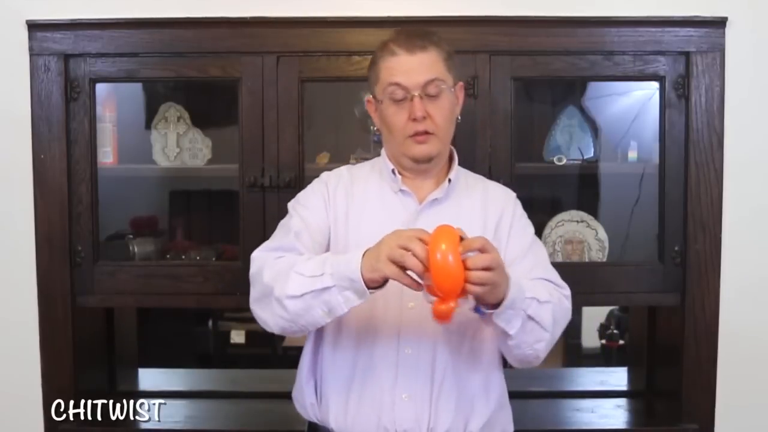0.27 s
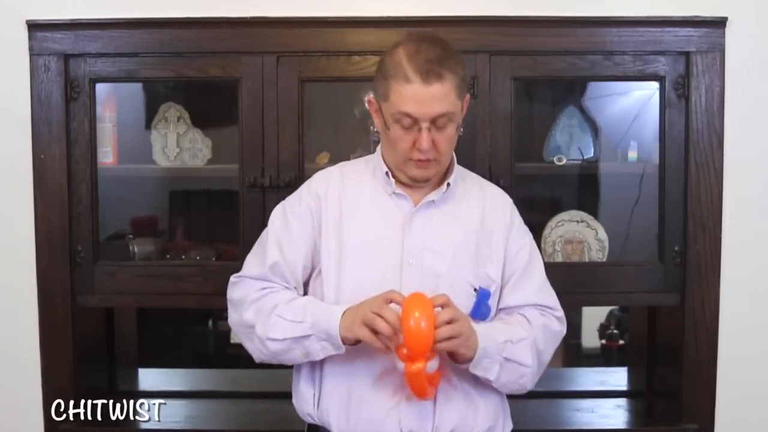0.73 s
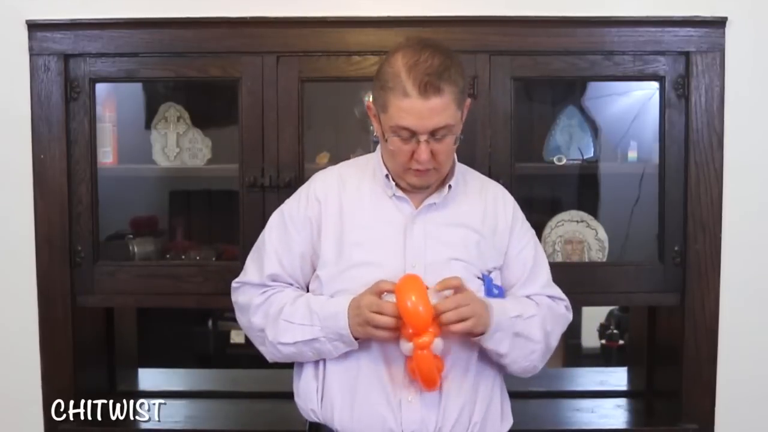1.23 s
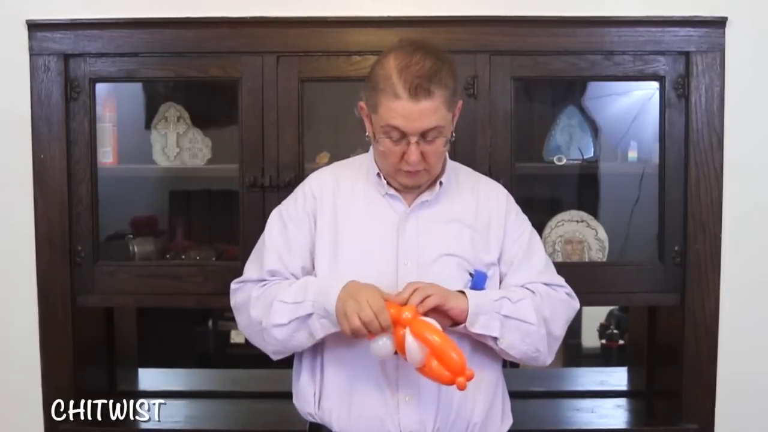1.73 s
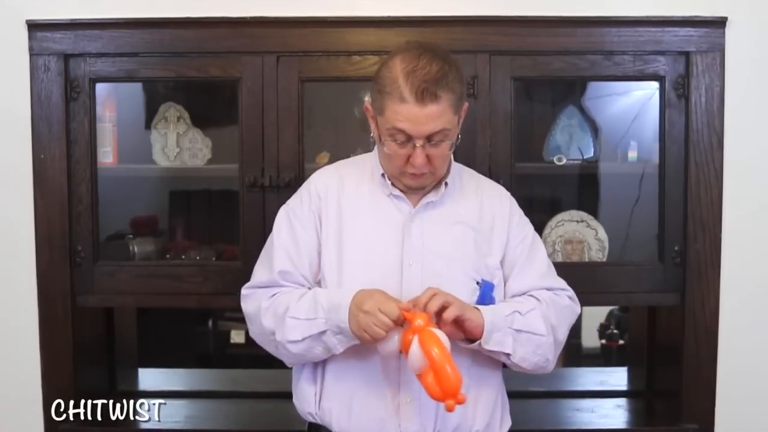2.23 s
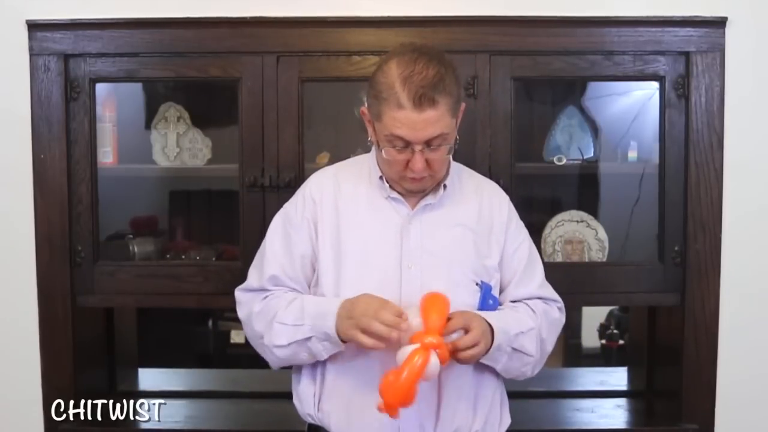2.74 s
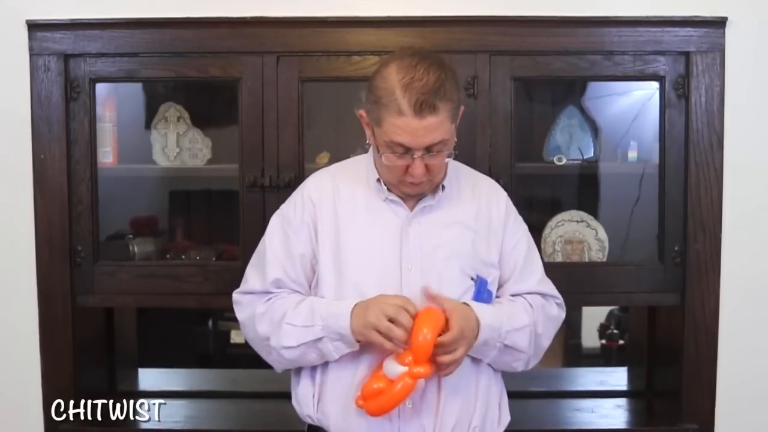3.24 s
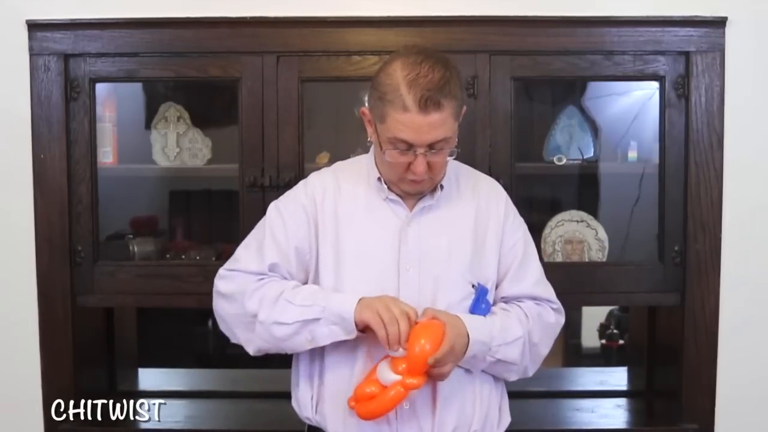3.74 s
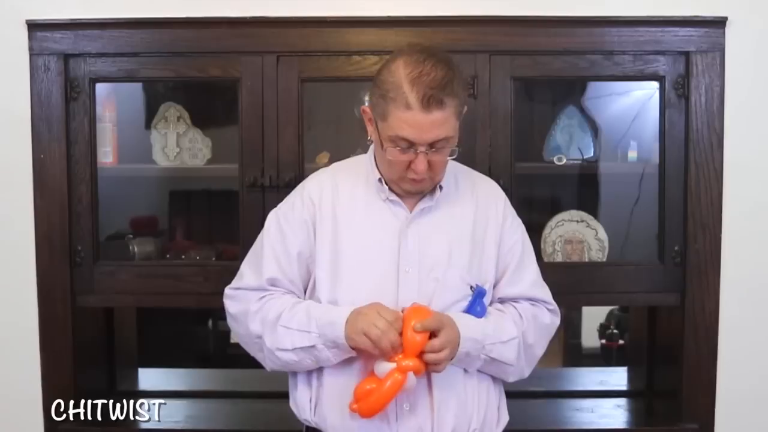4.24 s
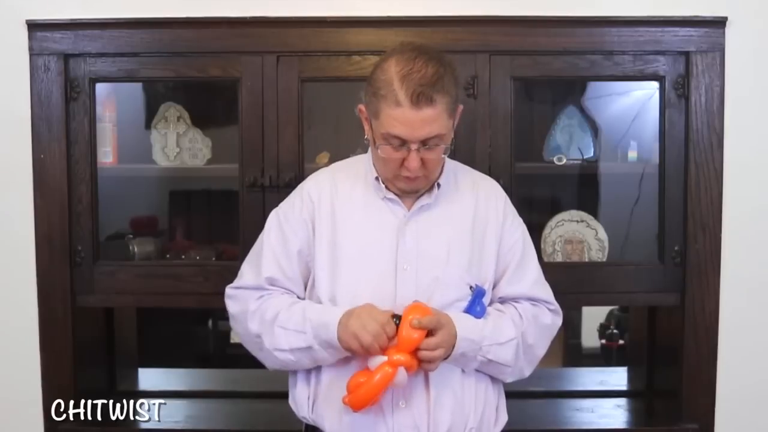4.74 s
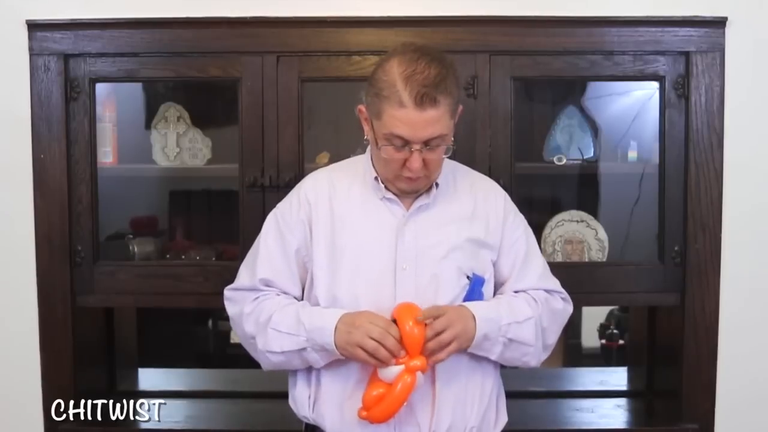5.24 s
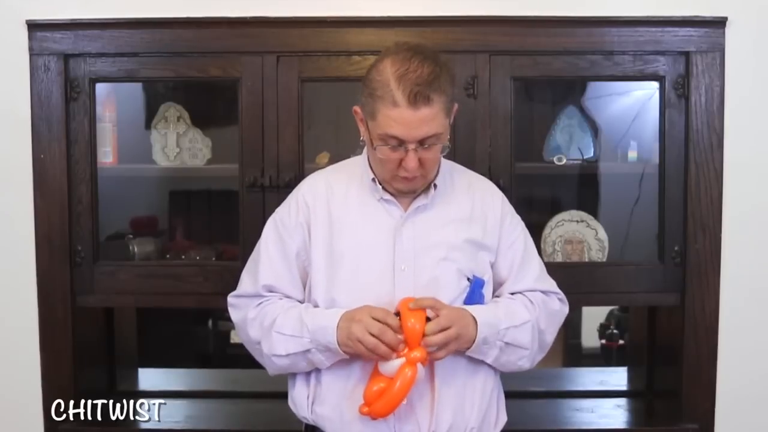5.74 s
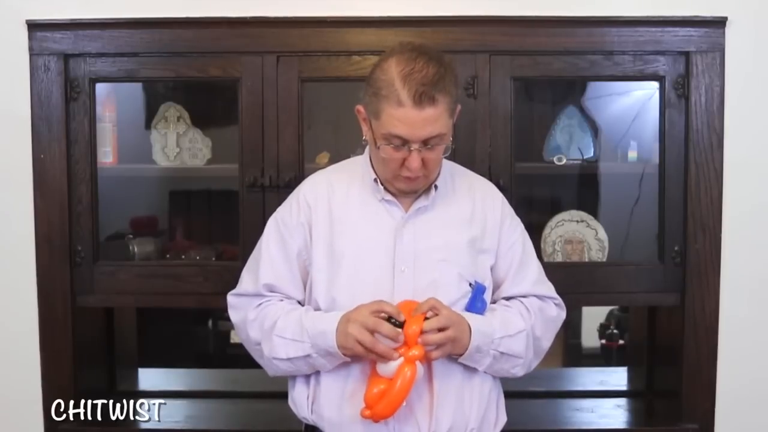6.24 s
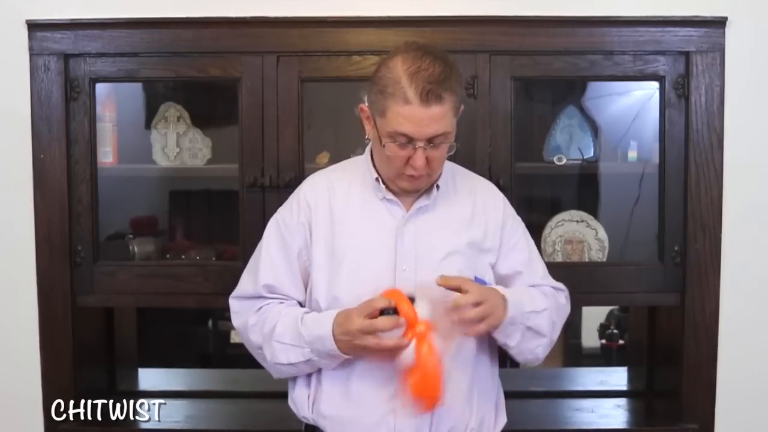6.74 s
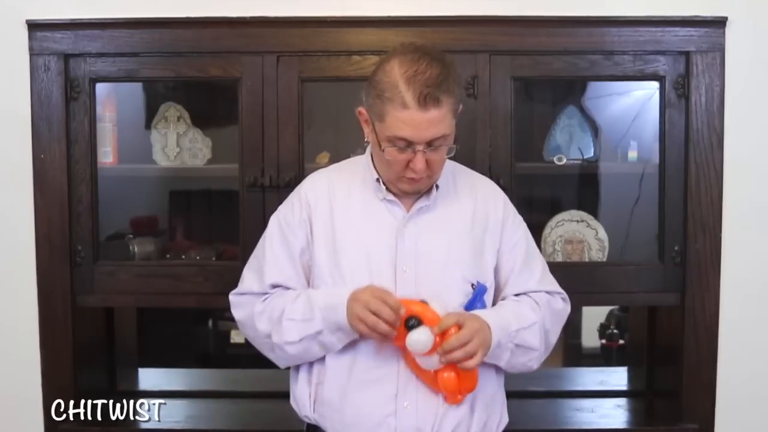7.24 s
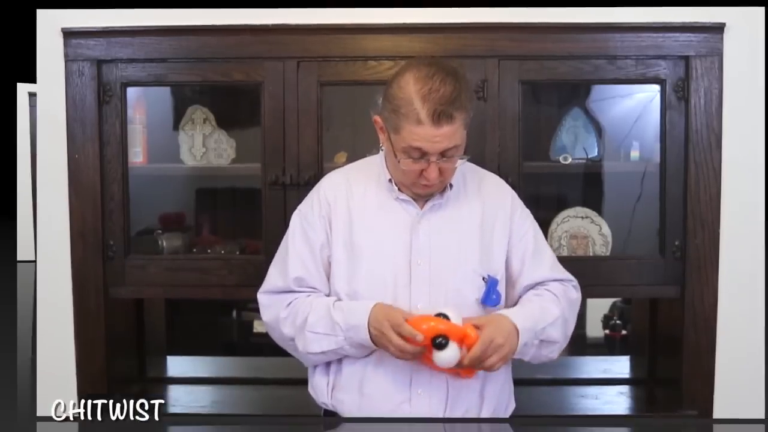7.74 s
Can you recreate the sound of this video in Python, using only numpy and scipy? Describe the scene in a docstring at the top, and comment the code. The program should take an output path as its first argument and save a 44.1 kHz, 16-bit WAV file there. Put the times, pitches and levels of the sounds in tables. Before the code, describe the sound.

A balloon creaks, rubs and squeaks in uneven bursts as it is twisted by hand, with little snaps and slight room echo.

```python
"""A bare living room, where hands squeeze and twist a latex balloon figure a couple of metres away.
Rubber sticks and slips on rubber. Irregular slips creak and groan in the air bubbles, or scrape and
hiss on the skin; periodic slips make pitched squeaks; a stuck patch that lets go makes a snap.
The hard walls reflect it all, and a faint room tone lies below."""
import sys
import numpy as np
from scipy import signal
from scipy.fft import rfft, irfft, next_fast_len
from scipy.io import wavfile
from scipy.ndimage import map_coordinates

SR = 44100
rng = np.random.default_rng(int(sys.argv[2]) if len(sys.argv) > 2 else 0)


def waveform_to_disk(signal):
    """Save audio, clipped to [-1, 1], as 16-bit WAV at the path in sys.argv[1]."""
    frames = np.transpose(np.atleast_2d(signal))
    scaled = np.clip(frames, -1, 1) * 32767
    samples = np.round(scaled).astype(np.int16)
    wavfile.write(sys.argv[1], SR, samples)


N = 352800
BAND_LIMIT_HZ = 15800

# Friction spectra of scraping rubber and of hissing skin: f/Hz, relative level/dB
SCRAPE_SPECTRUM = [(200, -42), (700, 2.5), (1100, -0.5), (2000, -1), (3500, 3.5), (5000, -10.5),
                   (16000, -77)]
HISS_SPECTRUM = [(250, -42), (1000, -7), (3000, -3), (4500, -3), (7000, -8), (10000, -12.5), (13000, -19.5),
                 (16000, -30)]


def amp(db):
    """Amplitude ratio of a level in decibels."""
    return 10 ** (np.asarray(db) / 20)


def unit(x):
    """Normalisation to an rms value of 1."""
    return x / np.sqrt(np.mean(x ** 2) + 1e-20)


def along(points, hz):
    """Interpolation of (f/Hz, value) points on a logarithmic frequency axis."""
    f, values = np.transpose(points)
    return np.interp(np.log(hz + 1), np.log(f + 1), values)


def wobble(count, rate):
    """Smooth random modulation: count samples of a spline with rate knots a second."""
    knots = rng.standard_normal(int(count * rate / SR) + 4)
    return map_coordinates(knots, [np.arange(count) * rate / SR])


def filtered(x, response):
    """Linear filtering: the spectrum of x times a complex frequency response."""
    size = next_fast_len(x.shape[-1] + 8192)
    return irfft(rfft(x, size) * response(np.fft.rfftfreq(size, 1 / SR)), size)[..., :x.shape[-1]]


def diffuse_pair(spectra, hz):
    """Spatial coherence: at two points of a diffuse field, long waves are alike and short ones are not."""
    # Left-right likeness: f/Hz, coherence
    coherence = [(30, 0.5), (100, 0.99), (300, 0.92), (600, 0.77), (1200, 0.27), (2500, 0.018),
                 (12000, 0.018)]
    angle = np.arccos(np.clip(along(coherence, hz), -1, 1)) / 2
    mid, side = spectra[0] * np.cos(angle), spectra[1] * np.sin(angle)
    return np.array([mid + side, mid - side])


def room_tone():
    """Ambient noise: air and street form a faint, steady diffuse field."""
    # Background spectrum: f/Hz, relative spectral density level/dB
    spectrum = [(20, -38), (40, -12), (100, -11), (200, -6.5), (300, -3.5), (800, -2), (2700, -8.5),
                (6000, -20), (15500, -42)]
    hz = np.fft.rfftfreq(N, 1 / SR)
    noise = diffuse_pair(rfft(rng.standard_normal((2, N))), hz)
    return amp(-47) * unit(irfft(noise * amp(along(spectrum, hz)), N))


def reflections(x, decay, tail_samples, patterns):
    """Reverberation: convolution with decaying diffuse tails, whose pattern changes as the hands move."""
    hop = N // patterns
    out = np.zeros((2, N + 3 * hop + tail_samples + 256))
    crossfade = np.hanning(2 * hop)
    x = np.pad(x, (hop, 2 * hop))
    hz, t, noise = signal.stft(rng.standard_normal((patterns + 1, 2, tail_samples)), SR, nperseg=256)
    fade = amp(-60 * t / along(decay, hz)[:, None])
    spectra = diffuse_pair(noise.swapaxes(0, 1), hz[:, None]) * fade
    tails = signal.istft(spectra, SR, nperseg=256)[1].swapaxes(0, 1)
    tails = unit(tails) / np.sqrt(tails.shape[-1])  # unit energy on average
    for i, tail in enumerate(tails):
        segment = x[i * hop:(i + 2) * hop] * crossfade
        wet = signal.fftconvolve(segment[None], tail, axes=1)
        out[:, i * hop:][:, :wet.shape[1]] += wet
    return out[:, hop:][:, :N]


def slips(per_s, spread_db, flutter_db):
    """Irregular stick-slip: a Poisson train of uneven pulses that flutters as the grip changes."""
    occurs = rng.random(N) < per_s / SR
    size = np.clip(rng.standard_normal(N), -2, 2)
    pulses = occurs * np.sign(size) * amp(spread_db * np.abs(size))
    return pulses * amp(flutter_db * wobble(N, 45))


def bubble_resonance(pulses, spectrum):
    """Modal superposition: pulses, shaped by a spectrum, drive the bubbles and the broadband skin."""
    # Modes of the balloon figure: f/Hz, bandwidth/Hz, level/dB
    modes = [(274, 23, -5), (335, 78, -2.5), (452.6, 17, -2.5), (536.5, 20, 3.5), (617, 39, -3),
             (748.5, 17, -0.5), (835, 42, -2), (1055, 250, 0), (1192, 117, 0.5), (2460, 890, 0.5)]

    def response(f):
        ringing = sum(amp(db) * 1j * f * width / (hz * hz - f * f + 1j * f * width)
                      for hz, width, db in modes)
        return amp(along(spectrum, f)) * (0.81 + ringing)
    return filtered(pulses, response)


def moving_resonance(x, times, centre_hz, lift_db, width_octaves):
    """Formant: one broad resonance moves as the balloon changes shape; the result has rms 1."""
    hz, t, spectra = signal.stft(x, SR, nperseg=1024, noverlap=768)
    detuning = np.log2((hz[:, None] + 1) / np.interp(t, times, centre_hz)) / width_octaves
    spectra = spectra * amp(lift_db * np.exp(-detuning ** 2 / 2))
    return unit(signal.istft(spectra, SR, nperseg=1024, noverlap=768)[1][:N])


def strokes(rows):
    """Incoherent addition: strokes sum in power, giving two gains and a power-weighted resonance."""
    start, swell, hold, ease, db, second_db, hz = np.transpose(rows)[:, :, None]
    times = np.arange(0, N, 64) / SR
    # Swell and ease are times per 20 dB; any value below 3 ms, negative ones too, acts as 3 ms.
    early = np.maximum(start - times, 0) / np.maximum(swell, .003)
    late = np.maximum(times - start - np.abs(hold), 0) / np.maximum(ease, .003)
    power = amp(db - 20 * (early + late)) ** 2 + 1e-14
    first_gain, second_gain = (np.interp(np.arange(N) / SR, times, np.sqrt(layer.sum(0)))
                               for layer in (power, power * amp(second_db) ** 2))
    centre_hz = np.exp((power * np.log(hz)).sum(0) / power.sum(0))
    return first_gain, second_gain, times, centre_hz


def slides():
    """Sliding friction: quick, light slips of fingers and rubber scrape and hiss on the stretched skin."""
    # Light strokes: t/s, swell/s, hold/s, ease/s, scrape level/dB, hiss re scrape/dB, skin resonance f/Hz
    light_strokes = [(0, .01, 0.0034, 0.12, -20, -3.5, 1510), (.08, 6, 0.17, 0.4, -33.5, 4, 1860),
                     (.25, -0.06, 0.098, -0.03, -21.5, -14, 1530),
                     (.33, -0.2, 0.13, -0.03, -24.5, -30, 1560), (.47, 0.1, 0.11, -0.05, -25.5, -4, 1390),
                     (.66, -6, 0.19, 0.57, -41.5, -2.5, 1990), (.8, 0.05, 0.14, 0.17, -23, -4.5, 1530),
                     (1.1, -2, 0.13, -0.5, -52, -6, 1330), (1.229, -0.07, 0.0045, -0.01, -15, -19, 1270),
                     (1.401, 0.12, 0.045, -0.0261, -22.5, -16, 1370),
                     (1.543, 3.5, 0.01, -0.43, -39.5, -10.5, 1370),
                     (1.924, 0.04, 0.0045, 0.34, -25, -5, 1800), (2.05, 0.07, 0.021, 0.15, -27.5, -3, 1520),
                     (2.2, 0.16, 0.35, -0.24, -40.5, 3.5, 2250),
                     (2.312, -0.05, 0.0032, 0.03, -24.5, -9.5, 1300),
                     (2.42, 0.05, 0.12, 0.18, -22.5, -6.5, 1590),
                     (2.638, 0.05, 0.047, 0.06, -21.5, -11, 1550), (2.83, -1.6, 0.017, -2, -48, 7, 3600),
                     (2.918, 0, 0.042, -0.03, -23.5, -8, 1700),
                     (3.075, 0.02, 0.06, 0.26, -22.5, -22.5, 1710), (3.16, 0, 0.061, 0.12, -23, -4, 1400),
                     (3.387, -1.07, 0.0053, 0.16, -27, -10, 1600),
                     (3.478, -0.1, 0.019, 0.04, -27, 4.5, 3660),
                     (3.53, 0.07, 0.024, 0.01, -19.5, -10, 1540),
                     (3.72, 0.2, 0.078, 0.2, -40.5, -5.5, 1630), (3.88, 0.07, 0.13, 0.29, -23, -17, 1510),
                     (3.946, -0.21, 0.0056, 0.09, -19, -2.5, 1750),
                     (4.06, 0.22, 0.077, 0.01, -23.5, -31.5, 1430), (4.317, 0.4, 0.034, 0.3, -42, 0, 2120),
                     (4.625, 0.01, 0.047, -0.28, -39.5, 9, 1210),
                     (4.655, 0.17, 0.015, 0.6, -32, -10.5, 1200),
                     (4.78, 0.36, 0.23, -0.25, -36.5, -3, 1880), (4.8, 0.0148, 0.013, 0.06, -31, 7, 4440),
                     (5, 0.07, 0.048, -0.06, -26.5, -17, 1580), (5.045, 0.07, 0.023, -0.08, -18, -23, 1500),
                     (5.12, 0.03, 0.032, 0.04, -36.5, 6.5, 2000), (5.295, 0.5, 0.019, 1.1, -37, -9, 2900),
                     (5.372, 0.17, 0.024, 0.12, -29, -2.5, 3560), (5.405, 0.23, .025, 0.17, -27, -15, 2600),
                     (5.43, 0.4, 0.02, 0.16, -23, -37, 1260), (5.526, 0.04, 0.0076, 0.3, -28.5, -18, 1310),
                     (5.63, 0, 0.12, 0.2, -33.5, -9.5, 1510), (5.9, -1, 0.24, 0, -35, -12, 1580),
                     (5.954, -0.64, 0.0023, 0.24, -37, 0, 1310),
                     (6.245, 0.06, 0.024, 0.5, -29, -19.5, 1560), (6.295, 0.08, 0.04, -0.1, -26, -20, 1420),
                     (6.35, -0.4, 0.046, 0.04, -29, -17, 1460), (6.45, -4.94, 0.04, 1.1, -44, -2, 1300),
                     (6.687, 0.05, 0.0089, 0.03, -24, 2, 2960), (6.827, 0.1, .005, 0.26, -37.5, -21, 1680),
                     (7.031, .006, 0.022, 0.09, -40.5, 10.5, 2320), (7.187, 0.6, .005, 1, -55, 5, 2280),
                     (7.425, 0.04, 0.053, -0.05, -24, -11.5, 1650),
                     (7.547, 0.26, 0.026, 0.15, -36, -7.5, 1290),
                     (7.772, 0.07, 0.028, -1.6, -38, -11, 2200), (7.85, 0.67, .03, 4, -36.5, -14.5, 1680),
                     (7.912, -0.06, 0.035, -0.5, -27.5, -10, 2000), (7.96, 0, .04, .1, -31, -8.5, 1940)]
    scrape_gain, hiss_gain, times, skin_hz = strokes(light_strokes)
    scrape = bubble_resonance(slips(1200, spread_db=4.0, flutter_db=1.26), SCRAPE_SPECTRUM)
    scrape = moving_resonance(scrape, times, skin_hz, lift_db=14, width_octaves=.36)
    fine_slips = slips(5000, spread_db=11.0, flutter_db=1.0)
    hiss = filtered(fine_slips, lambda f: amp(along(HISS_SPECTRUM, f)))
    return scrape_gain * scrape + hiss_gain * unit(hiss)


def twists():
    """Forced vibration: slow, heavy slips of rubber on rubber make the squeezed bubbles creak and groan."""
    # Heavy strokes: t/s, swell/s, hold/s, ease/s, creak level/dB, groan re creak/dB, resonance f/Hz
    heavy_strokes = [(0, .01, 0.08, 0, -31.5, -6, 765), (.25, 0.04, 0.067, 0.05, -34.5, 3.5, 710),
                     (.4, 1.5, 0.16, 0, -35, -14.5, 1010), (.75, 0.2, 0.098, 2, -44, -2, 640),
                     (.8, -0.14, 0.16, -0.3, -34.5, -7, 785), (.92, 0.01, 0.035, 0.05, -23.5, -11, 830),
                     (1.05, 0.7, 0.063, 0.17, -40.5, -12, 990), (1.233, 0, 0.026, 0.11, -31, -44, 664),
                     (1.325, 0.08, 0.12, 0, -31.5, -25.5, 700),
                     (1.401, -0.12, 0.06, -0.06, -22.5, -10, 500), (1.89, -0.27, 0.024, 0.5, -38, -22, 474),
                     (1.94, 0.05, 0.018, -0.3, -31, -21.5, 820), (2.05, -0.01, 0.0039, 0.05, -19, -22, 683),
                     (2.312, 0.33, 0.0078, -0.5, -36, -17, 950), (2.455, 0.0047, 0.1, 0.1, -20.5, -13, 470),
                     (2.63, 0.03, 0.068, -0.15, -23, -15, 760), (2.66, 0.32, 0.0081, 0.13, -41, 6, 500),
                     (2.918, -0.04, 0.037, 0, -30.5, -12, 536), (3.076, -0.03, 0.044, 0, -20.5, -12, 560),
                     (3.14, -0.03, 0.072, 0.01, -23, -24, 714), (3.387, 0.35, 0.11, -0.14, -39.5, -11, 740),
                     (3.53, 0.08, 0.035, -0.4, -28.5, -28, 812), (3.72, 0.1, 0.24, 0.1, -37, -12, 460),
                     (3.872, -0.15, .15, 0.06, -20, -31, 590), (4.07, -0.1, 0.079, 0.17, -28.5, -31, 600),
                     (4.324, 0, 0.04, 0.16, -37.5, -14, 670), (4.59, 0.03, 0.012, -0.2, -37.5, -7, 605),
                     (4.652, -0.02, 0.016, -0.23, -21, -38, 850),
                     (4.74, 0.23, 0.009, 0.05, -32.5, -28.5, 625), (4.8, 1, 0.26, 0.5, -44, -16.5, 795),
                     (5.03, 0.06, 0.029, 0.12, -26.5, -6, 603), (5.131, 0.5, 0.044, 0.9, -38, -3.5, 590),
                     (5.28, -0.06, 0.025, 0.02, -28, -1.5, 646), (5.41, 0.1, 0.035, 0.05, -28.5, -13, 593),
                     (5.528, -0.03, 0.016, 0.01, -21.5, -11.5, 845),
                     (5.575, 0, 0.0076, 0.05, -37.5, -1, 516), (5.6, -0.5, 0.1, 1.5, -39.5, -13, 663),
                     (5.88, 0.2, 0.082, 0.33, -31.5, -15.5, 623), (5.915, -0.5, 0.011, -0.1, -42, 8, 500),
                     (6.245, 0, 0.052, 0.12, -27.5, -13.5, 810), (6.285, 0.05, 0.012, -0.25, -47, 2.5, 900),
                     (6.355, -0.05, 0.014, 0.02, -30, -4, 690), (6.66, 0.4, 0.071, 0.1, -41, -18.5, 840),
                     (6.827, 0.5, .005, 0.14, -44.5, -4, 615), (6.97, 0.02, 0.016, 0, -47.5, -18, 590),
                     (7.02, 0, 0.022, 1, -48, -31, 617), (7.187, -0.5, 0.072, 1, -48.5, -14, 690),
                     (7.425, -0.06, 0.06, -0.04, -27, -15, 720), (7.547, -0.23, 0.027, 0, -33, -7.5, 755),
                     (7.62, -0.1, 0.03, 0.04, -35, -6, 676), (7.77, -0.5, 0.039, -0.5, -36.5, -16, 915),
                     (7.87, 0.2, 0.029, -5, -37, -21, 627), (7.905, -0.17, 0.11, .1, -30.5, -32, 810)]
    # Excitation spectra of the creak and the deeper groan: f/Hz, relative level/dB
    creak_spectrum = [(100, -76), (280, -29.5), (420, -3.5), (1000, -0.5), (1500, -24), (3000, -43),
                      (16000, -80)]
    groan_spectrum = [(40, -60), (100, -28), (170, -12.5), (260, -1.5), (340, 0.5), (450, -0.5),
                      (2000, -60)]
    creak_gain, groan_gain, times, hollow_hz = strokes(heavy_strokes)
    heavy_slips = slips(700, spread_db=3.0, flutter_db=1.2)
    groan = bubble_resonance(heavy_slips, groan_spectrum)
    creak = bubble_resonance(heavy_slips, creak_spectrum)
    creak = moving_resonance(creak, times, hollow_hz, lift_db=7, width_octaves=.32)
    return groan_gain * unit(groan) + creak_gain * creak


def snaps():
    """Damped transient: a stuck patch lets go with a crackle and shakes the skin around one pitch."""
    # Releases: t/s, level/dB, ring f/Hz, crackle re ring/dB
    releases = [(0.415, -26.5, 1730, 4.5), (.509, -25.5, 915, 4), (.92, -25, 805, -4),
                (.944, -23.5, 710, 7), (1.023, -23, 3040, 5.5), (1.372, -25.5, 3600, 4.5),
                (1.924, -22.5, 2500, 7.5), (2.186, -33, 1960, 9), (2.268, -24.5, 890, -0.5),
                (2.419, -23.5, 2230, 3.5), (2.584, -25.5, 3600, 10), (2.678, -17, 690, -5.5),
                (2.892, -20, 3730, 0.5), (2.908, -22, 1180, 6), (3.075, -27, 590, -8.5),
                (3.083, -21, 630, -18.5), (3.146, -28.5, 692, 6), (3.365, -41, 980, 6),
                (3.387, -21.5, 3020, -2), (3.411, -31, 1400, -5.5), (3.463, -22, 3180, -3),
                (3.872, -22, 900, -14.5), (3.478, -19.5, 4500, 6.5), (3.925, -23, 1050, 7),
                (4.04, -38.5, 8000, -9), (4.065, -27.5, 7500, -8), (4.135, -24.5, 2540, -8.5),
                (4.18, -22.5, 2500, -4), (4.525, -42.5, 12800, 4), (4.303, -36.5, 2820, 7),
                (4.316, -23, 2940, -2.5), (4.627, -22, 9600, -14), (4.776, -22, 3420, -2.5),
                (4.797, -19, 4770, 3.5), (5.047, -22, 1640, -9), (5.115, -26, 8000, 4),
                (5.306, -15, 2770, -21), (5.353, -16, 3260, -27), (5.371, -22.5, 9500, 4),
                (5.455, -42.5, 10500, -9), (5.526, -15.5, 1020, -21), (5.871, -21, 535, -33.5),
                (5.939, -30, 9000, 7.5), (6.059, -33, 10500, 5.5), (6.226, -34, 1490, -7),
                (6.455, -35, 12300, 6), (6.584, -43.5, 533, 1), (6.662, -28, 2880, 1.5),
                (6.688, -21, 3700, 0.5), (7.031, -29, 4770, -6), (7.05, -24, 8550, -9),
                (7.186, -33, 11700, -1), (7.188, -38, 3800, 0), (7.412, -38, 8300, 0),
                (7.49, -30, 12000, -1), (7.422, -32, 736, 0), (7.548, -22, 790, -13), (7.563, -39, 7000, 2),
                (7.612, -30, 2740, 1), (7.9, -28, 840, 0), (7.922, -24.5, 2120, -0.5)]
    out, t = np.zeros(N + SR), np.arange(SR // 8) / SR
    attack_s, crack_t60_s = 0.00077, 0.0043
    first_crack = 1 + amp(2.5 - 60 * t / crack_t60_s)
    for start, db, hz, crackle_db in releases:
        noise = rng.standard_normal((2, len(t)))
        crackle = filtered(
            noise[0], lambda f: amp(along(HISS_SPECTRUM, f)) + 0.6 * amp(along(SCRAPE_SPECTRUM, f)))
        ring = filtered(noise[1], lambda f: 1 / (1 + 4j * (f / hz - hz / (f + 1))) ** 2)
        t60_s = 0.068 / (hz / 1e3) ** 0.47  # higher snaps die sooner
        envelope = amp(-60 * t / t60_s) * (1 - np.exp(-t / attack_s))
        burst = amp(crackle_db) * first_crack * unit(crackle) + unit(ring)
        out[round(start * SR):][:len(t)] += amp(db) * envelope * burst
    return out[:N]


def squeaks():
    """Relaxation oscillation: slips locked to a rate give a harmonic series, blurred by uneven timing."""
    # Runs of periodic slips: t/s, duration/s, first f/Hz, last f/Hz, level/dB, spectral peak f/Hz,
    # fall from the peak/(dB per octave), relative jitter
    runs = [ (1.021, .018, 1080, 1065, -25, 2600, 12, .03), (1.231, .022, 570, 680, -15, 950, 17, .06),
            (1.232, .02, 2960, 2920, -23, 2930, 26, .012), (1.254, .04, 2940, 2880, -30, 2930, 26, .015),
            (1.231, .016, 4400, 4400, -29, 4400, 24, .05), (1.253, .042, 720, 690, -20, 1050, 22, .09),
            (1.256, .016, 4450, 4450, -33, 4450, 24, .04), (1.295, .062, 1450, 1380, -24, 1400, 22, .13),
            (1.32, .038, 720, 800, -25, 750, 18, .13), (1.385, .065, 235, 235, -22, 470, 12, .08),
            (1.445, .055, 235, 230, -26, 450, 16, .07), (2.042, 0.043, 628, 640, -20.5, 630, 8, 0),
            (2.245, .02, 2350, 2320, -35.5, 2340, 14, 0.04), (2.268, .06, 902, 948, -30, 920, 14, .09),
            (2.412, 0.042, 2410, 2375, -24, 2340, 10.5, 0.12),
            (2.646, 0.042, 163, 161, -29.5, 222, 3.5, 0.03), (2.829, .04, 1815, 1880, -31, 3700, 30, .02),
            (2.833, .05, 7500, 7250, -40, 7400, 24, .02), (2.865, .028, 1850, 1900, -36, 3800, 24, .025),
            (3.077, .045, 310, 300, -23, 600, 12, .09), (3.525, .024, 2720, 2760, -19, 2740, 24, .08),
            (3.541, .012, 770, 760, -22, 770, 14, .04), (3.55, .09, 2780, 2730, -31, 2750, 24, .04),
            (3.565, .055, 790, 770, -30, 780, 16, .05), (4.775, .015, 1108, 1090, -25, 3300, 9, .03),
            (4.8, .06, 4900, 4300, -27, 4600, 14, .09), (5.04, .043, 254, 250, -27, 450, 17, .11),
            (5.297, .016, 1020, 1060, -20, 3000, 18, .05), (5.3, .045, 4150, 4050, -31, 4100, 20, .04),
            (5.354, .008, 3200, 3200, -23, 3200, 14, .05), (5.37, .05, 3800, 3100, -24, 3600, 16, .06),
            (5.397, .055, 240, 236, -26, 240, 2, .08), (5.533, .066, 264, 260, -25, 530, 6, .11),
            (5.86, 0.057, 555, 547, -34, 560, 5, 0.07), (5.881, 0.088, 330.5, 322, -28.5, 334, 19, 0),
            (6.245, .085, 600, 590, -23, 1100, 17, .08), (6.35, .06, 600, 590, -29, 1200, 17, .08),
            (6.661, .022, 2418, 2400, -31, 4800, 18, .03), (6.682, .008, 2650, 2800, -25, 2700, 20, .03),
            (6.687, .014, 960, 930, -20, 2600, 13, .03), (6.7, .018, 940, 930, -23, 3100, 13, .03),
            (6.718, .014, 1920, 1980, -25, 1950, 12, .03), (6.737, .009, 1950, 1930, -27, 1950, 16, .03),
            (6.735, .052, 4420, 4330, -35, 4400, 24, .025), (6.762, .022, 1930, 1980, -34, 1950, 20, .035),
            (7.03, .019, 2350, 2400, -24, 3000, 9, .035), (7.03, .009, 1200, 1190, -26, 4800, 14, .03),
            (7.049, .012, 2280, 2300, -17, 2500, 11, .035), (7.061, .02, 2180, 2260, -25, 2700, 10, .05),
            (7.058, .008, 3545, 3500, -26, 3540, 18, .03), (7.084, .014, 2400, 2130, -24, 2500, 10, .02),
            (7.103, .011, 2260, 2320, -30, 2700, 9, .035), (7.117, .014, 2400, 2250, -30, 2700, 9, .04),
            (7.135, .013, 2320, 2280, -35, 2800, 9, .04), (7.153, .02, 2230, 2280, -37, 2500, 10, .03),
            (7.36, .05, 3265, 3215, -38, 3240, 24, .03), (7.616, .05, 800, 770, -29, 790, 18, .05),
            (7.61, .022, 2816, 2780, -33, 2870, 24, .06), (7.95, 0.038, 1440, 1390, -28, 1450, 20, 0.11)]
    thin_below_hz, dull_above_hz = 80, 10000
    out, harmonic = np.zeros(N + SR), np.arange(1, 13)[:, None]
    for start, length, first_hz, last_hz, db, peak_hz, fall_db, jitter in runs:
        n = round(length * SR)
        progress = np.arange(n) / n
        glide_hz = first_hz + (last_hz - first_hz) * progress
        slip_hz = glide_hz * (1 + jitter * (wobble(n, 1200) + .35 * wobble(n, 180)))
        partial_hz = harmonic * first_hz
        partial_db = -fall_db * np.abs(np.log2(partial_hz / peak_hz)) + rng.normal(0, 1.5, harmonic.shape)
        rolloff = (partial_hz < BAND_LIMIT_HZ) / (1 + (partial_hz / dull_above_hz) ** 4)
        phase = 2 * np.pi * np.cumsum(slip_hz) / SR
        tone = (amp(partial_db) * rolloff * np.sin(harmonic * phase)).sum(0)
        throb = amp(2 * wobble(n, 120) + 3 * wobble(n, 400))
        bite = np.minimum(1, progress * length / .002)
        release = np.minimum(1, (1 - progress) / .2) * amp(-5 * progress)
        out[round(start * SR):][:n] += amp(db) * bite * release * throb * unit(tone)
    # The squeaks are thin, with little below 80 Hz.
    return filtered(out[:N], lambda f: 1 / (1 - 1j * thin_below_hz / (f + 1)) ** 2)


def scene():
    """Superposition of direct sound, early reflections, wall reverberation and room tone."""
    # Decay at the cabinet and wall close behind, and in the whole room: f/Hz, T60/s
    near_decay = [(100, 0.043), (14000, 0.05)]
    room_decay = [(100, 0.27), (500, 0.35), (1200, 0.32), (3000, 0.34), (6000, 0.39), (10000, 0.27),
                  (15000, 0.095)]
    near_delay_s = .003  # extra path to the near surfaces and back
    snapping = snaps()
    rubbing = twists() + slides()
    squeaking = squeaks()
    # Directivity: snaps and squeaks beam toward the listener, and squeaks are weaker toward the walls.
    direct = rubbing + amp(2.5) * snapping + amp(3) * squeaking
    to_walls = rubbing + snapping + amp(-3) * squeaking
    delayed = np.pad(to_walls, (round(near_delay_s * SR), 0))[:N]
    early = reflections(delayed, near_decay, tail_samples=3072, patterns=300)
    late = reflections(to_walls, room_decay, tail_samples=20480, patterns=40)
    return direct * amp([[-7], [-7.5]]) + amp(-2.5) * early + amp(-7.0) * late + room_tone()


def record(dry):
    """Band limiting: the microphone rolls off below 90 Hz and passes nothing above its upper limit."""
    return filtered(dry, lambda hz: (hz < BAND_LIMIT_HZ) / (1 - 1j * 90 / (hz + 1)) ** 2)


dry = scene()
out = record(dry)
waveform_to_disk(out)
```